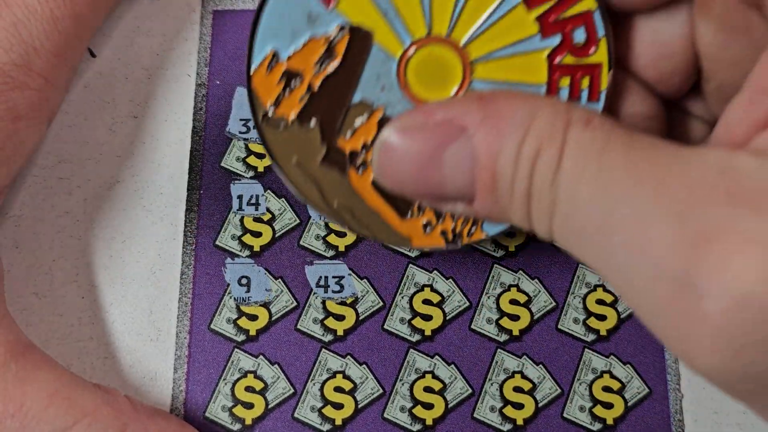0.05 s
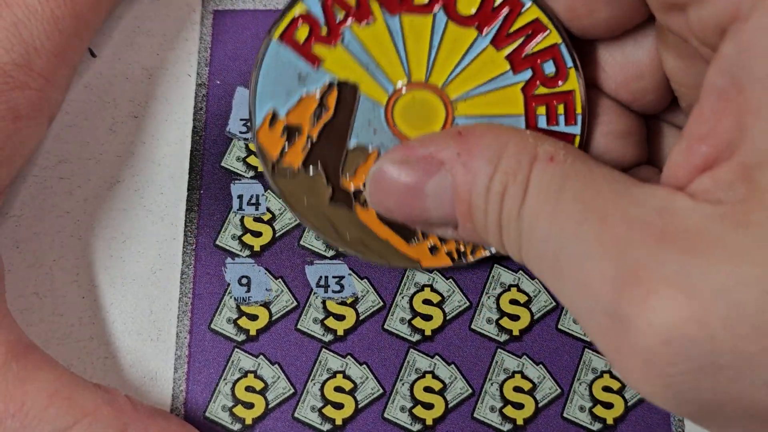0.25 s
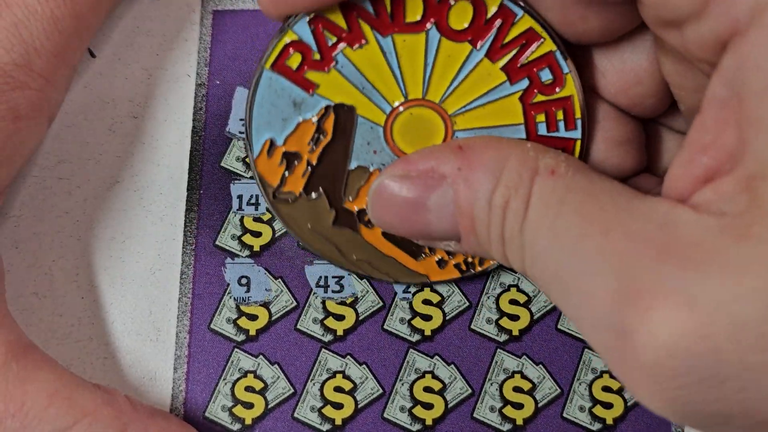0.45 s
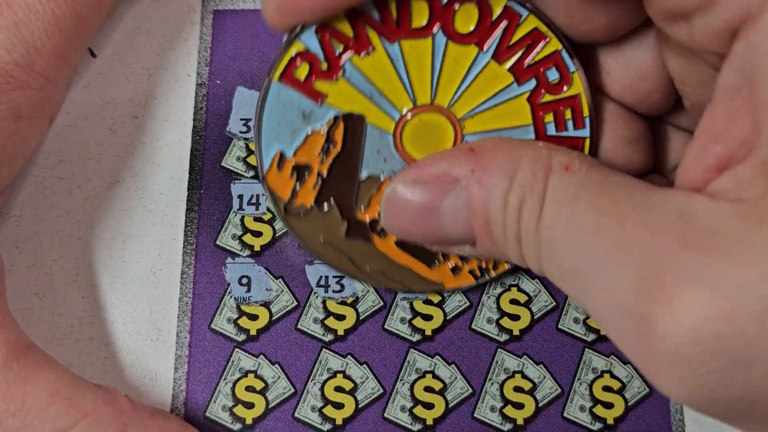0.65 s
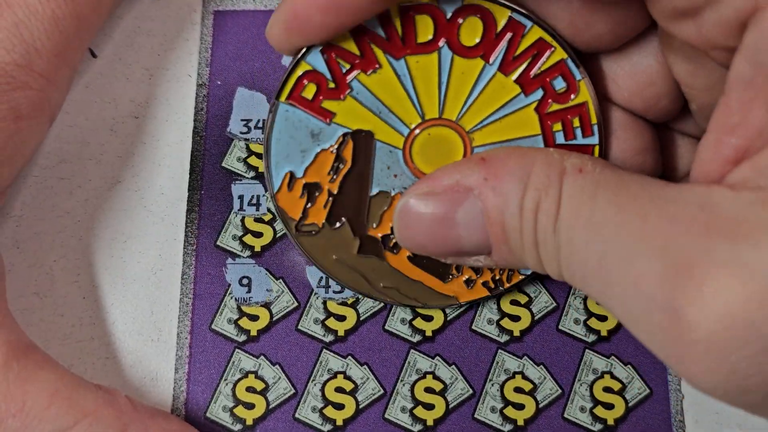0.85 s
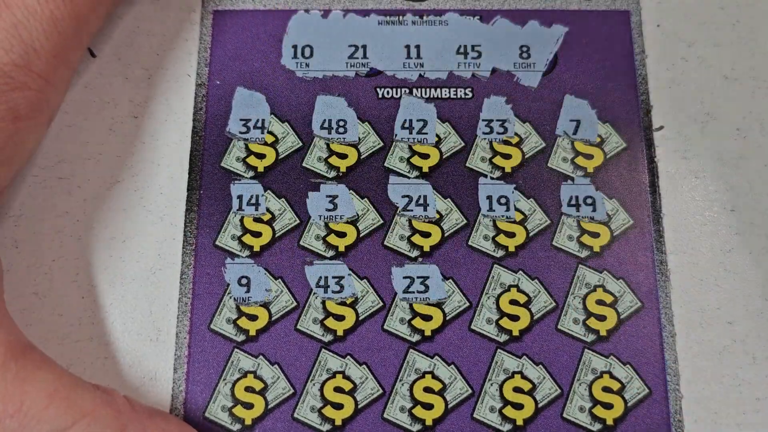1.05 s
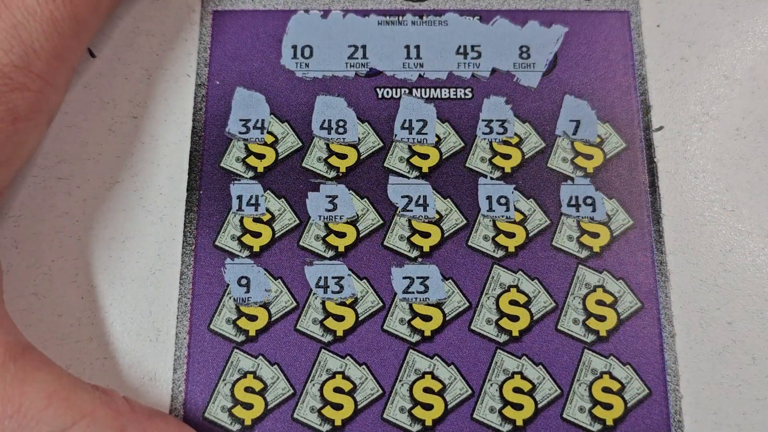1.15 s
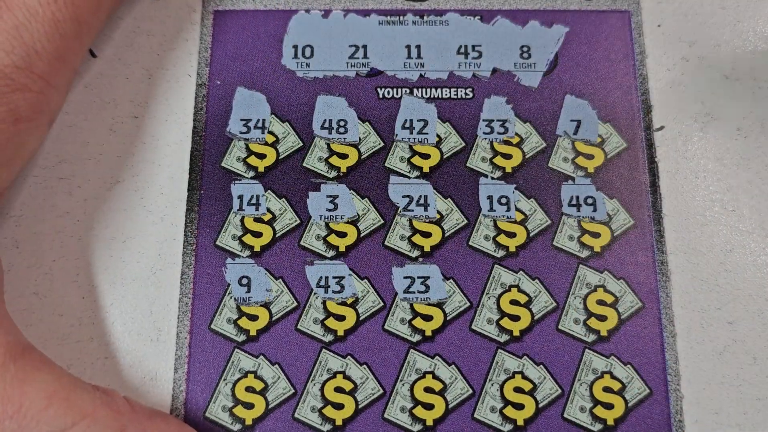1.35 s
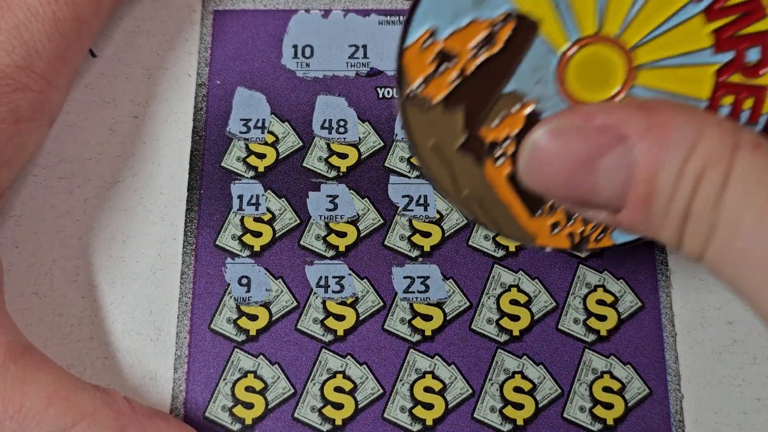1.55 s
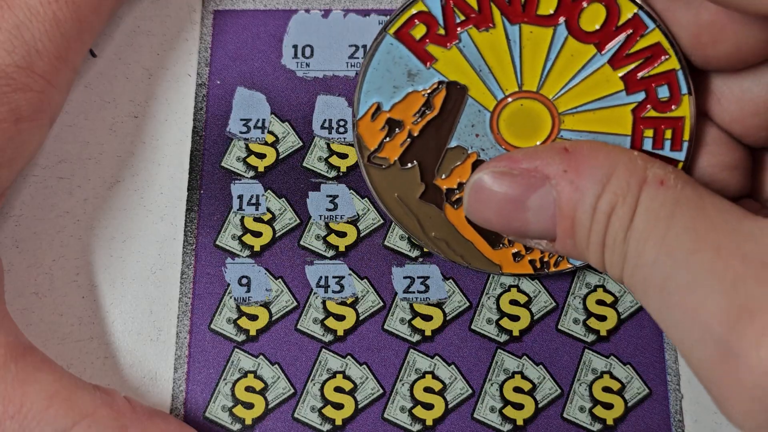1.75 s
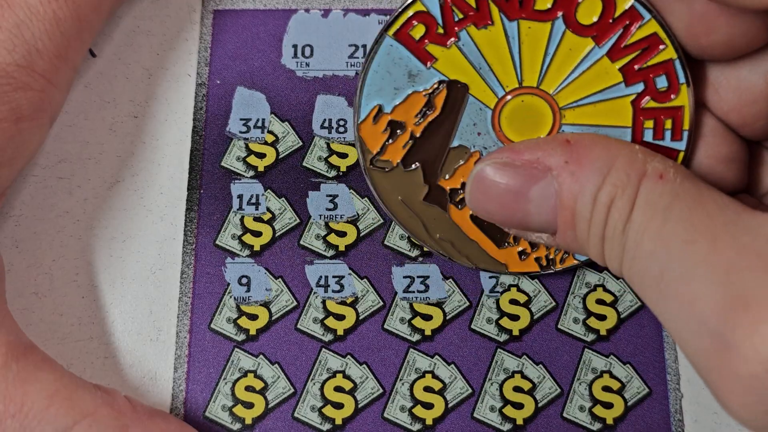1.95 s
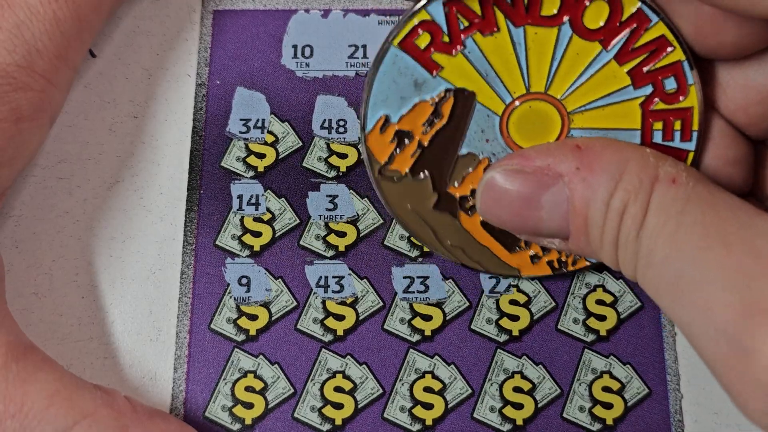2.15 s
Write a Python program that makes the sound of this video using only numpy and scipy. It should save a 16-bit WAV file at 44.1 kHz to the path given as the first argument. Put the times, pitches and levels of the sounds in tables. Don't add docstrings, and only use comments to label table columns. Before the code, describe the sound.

A heavy metal coin knocks down and scratches a paper ticket on a table in quick gritty strokes, pauses while the card rustles and air thumps softly, then knocks harder and scratches again; close stereo microphone, quiet humming room.

```python
import sys
import numpy as np
from scipy import signal
from scipy.fft import rfft, irfft
from scipy.io import wavfile

SR = 44100
rng = np.random.default_rng(int(sys.argv[2]) if len(sys.argv) > 2 else 0)


def gain_from_db(level_db):
    decades = np.asarray(level_db, float) / 20
    return 10 ** decades


def transcribe(signal):
    frames = np.atleast_2d(signal).T
    limited = np.clip(frames, -1, 1)
    pcm = np.round(limited * 32767).astype(np.int16)
    wavfile.write(sys.argv[1], SR, pcm)


N = 97020


def evened(x):
    return x / np.sqrt(np.mean(x ** 2) + 1e-20)


def read(points, hz):
    f, value = np.transpose(points)
    return np.interp(np.log(hz + 1), np.log(f + 1), value)


def along(points):
    s, db = np.transpose(points)
    return gain_from_db(np.interp(np.arange(N) / SR, s, db, left=-120, right=-120))


def tint(x, gain_db):
    return irfft(rfft(x) * gain_from_db(read(gain_db, np.fft.rfftfreq(N, 1 / SR))), N)


def drift(rate_hz):
    return evened(signal.lfilter(*signal.butter(2, rate_hz, fs=SR), rng.standard_normal(N)))


def add(mix, s, sound):
    part = mix[..., round(s * SR):][..., :sound.shape[-1]]
    part += sound[..., :part.shape[-1]]


def convolved(x, pair):
    return signal.oaconvolve(x[None], pair, axes=1)[:, :N]


def likened(a, b, like):
    return np.array([a, like * a + np.sqrt(1 - like ** 2) * b])


# f/Hz, likeness/1
LIKENESS = [(60, 1), (130, 0.95), (400, 0.98), (1000, 0), (9000, 0.14)]
# f/Hz, density/dB per Hz
ROOM_TONE = [(15, -39), (25, 4.5), (130, -24), (194, -15.5), (414, -17.5), (637, -41), (1280, -39.5),
             (8270, -67), (15800, -83)]
# f/Hz, width/Hz, level/dB
WHINES = [(2130, 120, -88), (3170, 86, -88), (1080, 690, -81.5)]


def room():
    floor_db, hum = -55, (119, 22, -54)
    hz = np.fft.rfftfreq(N, 1 / SR)
    a, b = rfft(rng.standard_normal((2, N)))
    z = likened(a, b, np.clip(read(LIKENESS, hz), 0, 1))
    out = gain_from_db(floor_db) * evened(irfft(z * gain_from_db(read(ROOM_TONE, hz)), N))
    for f, width_hz, db in WHINES + [hum]:
        resonance = 1 / (1 + ((hz - f) / (width_hz / 2)) ** 2)
        out += gain_from_db(db) * evened(irfft(z * resonance, N))
    return out


# t/s, level/dB
AIR = [(0, -62), (.5, -52), (.9, -48.5), (1.1, -40), (1.45, -43.5), (1.75, -49), (1.95, -49.5), (2.2, -49)]
# f/Hz, density/dB per Hz
AIR_TONE = [(20, -24.5), (45, 8), (90, 1.5), (200, -15), (400, -13.5), (700, -49), (1500, -73)]
# t/s, level/dB, f/Hz
PUFFS = [(0.714, -35.5, 100), (0.873, -37, 148), (0.899, -25, 110), (0.905, -32, 256), (1.068, -29.5, 109),
         (1.085, -28.5, 305), (1.123, -32, 105), (1.16, -31, 109), (1.195, -32, 333), (1.265, -39.5, 313),
         (1.288, -33, 226), (1.321, -32.5, 237), (1.336, -29, 106), (1.348, -31, 198), (1.407, -31.5, 58),
         (1.514, -26.5, 110), (1.578, -33, 102), (1.611, -31.5, 63.6), (1.64, -29.5, 73.4),
         (1.674, -31, 95), (1.911, -35, 59.7), (2.147, -41, 89.5)]


def buffeting():
    lump_db, right_db, puff_turns = 4.5, -9.5, 2.23
    lumpy = rng.standard_normal(N) * gain_from_db(lump_db * drift(38.0))
    left = evened(tint(lumpy, AIR_TONE)) * along(AIR)
    for s, db, hz in PUFFS:
        u = np.arange(0, puff_turns / hz, 1 / SR) * hz / puff_turns
        swell = np.sin(np.pi * u ** 0.46) ** 2
        add(left, s, gain_from_db(db) * swell * np.sin(2 * np.pi * (puff_turns * u + rng.random())))
    low = signal.lfilter(*signal.butter(2, 160.0, fs=SR), left)
    return np.array([left, gain_from_db(right_db) * low])


# t/s, level/dB
RUSTLE = [(0, -81), (.19, -68), (.3, -70.5), (0.88, -61), (0.908, -67), (1.09, -69.5), (1.184, -62.5),
          (1.33, -68), (1.492, -75), (1.528, -75), (1.698, -100), (1.72, -65.5), (2.2, -71.5)]
# f/Hz, density/dB per Hz
RUSTLE_TONE = [(290, -25.5), (500, -11), (760, -22), (1760, -32.5), (3090, -29.5), (7500, -42),
               (9700, -52.5), (11300, -45), (15800, -46.5)]


def rustle():
    level_db, patchy_db = 3, 1.2
    pair = [evened(tint(rng.standard_normal(N), RUSTLE_TONE)) for _ in range(2)]
    return np.array(pair) * along(RUSTLE) * gain_from_db(level_db + patchy_db * drift(36.0))


def nearby(x):
    early_db, early_t60_s, late_db, late_t60_s = -9, 0.02, -17, 0.46
    t = np.arange(SR // 3) / SR
    taps = rng.choice([-1., 1.], (2, len(t))) * (rng.random((2, len(t))) < 0.06)
    early, late = [taps * gain_from_db(-60 * t / t60) for t60 in (early_t60_s, late_t60_s)]
    early = gain_from_db(early_db) * early / np.linalg.norm(early[0])
    early[0, 0], early[1, 6] = 1, 1
    z = rfft(early[:, :1024])
    ir = gain_from_db(late_db) * late / np.linalg.norm(late[0])
    add(ir, 0, irfft(z / np.sqrt(abs(z) + 0.1)))
    return convolved(x, ir)


def ringing(drive, modes):
    wander_db = 3.5
    t, out = np.arange(2048) / SR, np.zeros((2, N))
    quarter = np.array([[np.pi / 2], [0]])
    for hz, width_hz, db in modes:
        ring = t * np.exp(-1.5 * np.pi * width_hz * t) * np.sin(2 * np.pi * hz * t + quarter)
        wander = wander_db * np.array([drift(24.0), drift(20.0)])
        out += gain_from_db(db + wander) * convolved(drive, ring / np.linalg.norm(ring[0]))
    return out


# f/Hz, width/Hz, level/dB
COIN = [(4520, 110, 0), (4350, 200, -3), (6500, 200, -7), (7500, 350, -17), (9800, 300, -17),
        (11390, 110, -7), (11050, 400, -10), (12200, 500, -15), (13400, 600, -18)]
# f/Hz, width/Hz, level/dB
COIN_LOW = [(2890, 80, 0), (2700, 90, -6), (3360, 110, -3), (3700, 150, -6)]
# t/s, level/dB, decay/s
TICKS = [
    (0.034, -59, 0.0036),
    (0.1705, -74, .003),
    (.7765, -63, 0.0022),
    (0.947, -56, .0015),
    (1.312, -58, 0.0019),
    (1.977, -68, 0.0018),
    (2.17, -59, 0.007),
]
# f/Hz, gain/dB
DRY_TONE = [(1500, -25), (2500, -6), (4300, 0), (7500, -5), (9000, -18), (12000, -14), (15500, -10)]


def ticks():
    ring_gain = 0.08
    air, t = np.zeros(N), np.arange(1500) / SR
    for s, db, decay_s in TICKS:
        add(air, s, gain_from_db(db) * np.exp(-t / decay_s) * rng.standard_normal(1500))
    return nearby(tint(air, DRY_TONE)) + ring_gain * ringing(air, COIN_LOW + COIN)


# f/Hz, level/dB, t60/s
TABLE = [(110, -5.5, 0.13), (238.8, -9.5, 0.33), (314.6, -3.5, 0.35), (350, -4, 0.2), (380.7, -8.5, 0.39),
         (469.2, -12.5, 0.17), (497, -6, 0.19), (595.7, -3.5, 0.088), (682, -18.5, 0.076), (834, -5, 0.1),
         (936, -6, 0.074), (1118, -22, 0.1), (1346, -2.5, 0.14), (1930, -21, 0.066)]
# f/Hz, density/dB per Hz
DENSE = [(80, 7), (200, -5.5), (350, 10), (700, 3.5), (1200, 3.5), (1600, -5), (2150, 9.5), (3500, -45)]
# f/Hz, t60/s
DENSE_T60 = [(200, 0.31), (700, 0.22), (1400, 0.21), (3000, 0.057)]


def table_ring():
    cluster, skew_hz, dense_db = 0.012, 520, -1
    hz, db, t60 = np.repeat(np.transpose(TABLE), 3, axis=1)[:, :, None]
    t = np.arange(SR // 2) / SR
    detune, skew = rng.uniform(-1.045, 1, (2, len(hz), 1))
    turn = 2 * np.pi * hz * (1 + cluster * detune) * t
    decay = gain_from_db(db - 60 * t / t60)
    phase = skew * hz / skew_hz
    modes = np.array([(decay * np.cos(turn + side * phase)).sum(0) for side in (1, -1)])
    f, s, z = signal.stft(rng.standard_normal((2, len(t))), SR, nperseg=256)
    z = likened(z[0], z[1], np.clip(read(LIKENESS, f), 0, 1)[:, None])
    fade_db = read(DENSE, f)[:, None] - 60 * s / read(DENSE_T60, f)[:, None]
    crowd = signal.istft(z * gain_from_db(fade_db), SR, nperseg=256)[1][:, :len(t)]
    crowd = crowd * np.minimum(t / 0.0035, 1)
    return modes / np.linalg.norm(modes[0]) + gain_from_db(dense_db) * crowd / np.linalg.norm(crowd[0])


def slipping():
    slips_per_s, spread_db, chatter_db = 9000, 2.4, 1.2
    sizes = gain_from_db(spread_db * np.minimum(rng.exponential(1, N), 4)) * rng.choice([-1., 1.], N)
    slips = sizes * (rng.random(N) < slips_per_s / SR)
    return evened(slips + 0.39 * rng.standard_normal(N)) * gain_from_db(chatter_db * drift(87.0))


def stroke(length_s, db, rise=0.15, fall=0.66):
    u = np.arange(0, length_s, 1 / SR) / length_s
    return gain_from_db(db) * np.clip(np.minimum(u / rise, (1 - u) / fall), 0, 1) ** 1.44


# t/s, level/dB, length/s
BRUSHES = [
    (0.16, -73.5, 0.066),
    (0.192, -65, 0.027),
    (0.95, -68, 0.034),
    (1.159, -73, 0.016),
    (1.304, -70, 0.012),
    (1.726, -49.5, 0.025),
]
# t/s, length/s, level/dB, table share/dB, low ring share/dB
FORTH = [
    (0.29, 0.059, -51.5, 3, -7),
    (0.478, 0.064, -62.5, 13, -2.5),
    (0.658, 0.065, -59, 5.5, -4.5),
    (0.832, 0.053, -57.5, 9.5, -0.5),
    (1.826, 0.056, -52.5, 0.5, -6.5),
    (2.003, 0.069, -63.5, 8.5, -3),
    (2.183, 0.053, -54.5, 3, -3),
]
# t/s, length/s, level/dB, table share/dB, low ring share/dB
BACK = [
    (0.394, 0.063, -57, 4, 0),
    (0.607, 0.029, -61, 10, 4),
    (0.779, 0.041, -56, 0.5, 1),
    (1.924, 0.048, -49, -4.5, -3),
    (2.135, 0.021, -59, 10, -0.5),
]
# f/Hz, density/dB per Hz
GRIT = [(500, -10), (1100, -2), (2050, 0), (2500, -9), (4300, -10), (5500, -28), (8600, -31), (15500, -32)]
# f/Hz, density/dB per Hz
GRIT_BACK = [(500, -8), (1100, -4), (2200, -14), (3000, -3), (4300, -7), (5500, -26), (8600, -28),
             (15500, -29)]
# f/Hz, width/Hz, level/dB
CARD = [(509.4, 27, 2), (604, 105, -0.5), (679, 130, -3.5), (880, 13, -4), (963, 45, -1), (1104, 50, -10),
        (1380, 17, -6.5)]


def scraping(table):
    grit_db, grit_back_db, second_train_db = -0.5, 2.5, -23
    coin_db, low_db, card_db, table_db = -4, -3.5, -7.5, -2
    lead_s, coast_s, coast_db, hiss_coast_db = 0.022, 0.038, -21, -35
    forth, back, push, low, light = np.zeros((5, N))
    for rows, way, rise, fall in ((FORTH, forth, 0.37, 0.33), (BACK, back, 0.18, 0.74)):
        for s, length_s, db, share_db, low_share_db in rows:
            for mix, more_db in ((way, 0), (push, share_db), (low, low_share_db)):
                add(mix, s, stroke(length_s, db + more_db, rise, fall))
    for s, db, length_s in BRUSHES:
        add(light, s, stroke(length_s, db))

    t = np.arange(-SR // 4, SR // 4 + 1) / SR
    coast = np.exp(-np.maximum(t / coast_s, -t / lead_s)) / (coast_s * SR) * gain_from_db(13)
    uneven = gain_from_db(1.2 * drift(57.0))

    def dragged(pressure, db):
        return uneven * (pressure + gain_from_db(db) * signal.oaconvolve(pressure, coast, "same"))

    rough_forth, rough_back = dragged(forth, hiss_coast_db), dragged(back, hiss_coast_db)
    forth, back = dragged(forth, coast_db - 17), dragged(back, coast_db - 15)
    push, low = dragged(push, coast_db), dragged(low, coast_db)

    slips = slipping()
    out = np.zeros((2, N))
    for train, db in ((slips, 0), (slipping(), second_train_db)):
        hiss = (gain_from_db(grit_db) * rough_forth + light) * evened(tint(train, GRIT))
        hiss += gain_from_db(grit_back_db) * rough_back * evened(tint(train, GRIT_BACK))
        out += nearby(gain_from_db(db) * hiss)
    out += gain_from_db(coin_db) * ringing((forth + back + 0.28 * light) * slips, COIN)
    out += gain_from_db(card_db) * ringing(push * slips, CARD)
    out += gain_from_db(low_db) * ringing((low + 0.42 * light) * slips, COIN_LOW)
    return out + gain_from_db(table_db) * convolved(push * slips, table)


# t/s, level/dB, rim tick/dB
KNOCKS = [
    (0.2027, -25, -9),
    (1.728, -18.5, -8),
]
# f/Hz, gain/dB
TICK_TONE = [(1000, 19.5), (5000, -5), (12000, -10), (15500, -5), (16500, -45)]


def knocks(table):
    blow_s, rebound, thud_db = 0.00081, 0.9, -6
    tick_lead_s, tick_decay_s, coin_gain = 0.00086, 0.00092, 0.22
    air, wood = np.zeros(N), np.zeros((2, N))
    blow = -np.sin(np.pi * np.arange(0, blow_s, 1 / SR) / blow_s) ** 2
    ring = convolved(blow, table)
    ring = ring / abs(ring).max()
    dent = np.r_[blow, -rebound * np.repeat(blow, 2)]
    add(ring, 0, gain_from_db(thud_db) * np.tile(dent, (2, 1)))
    t = np.arange(600) / SR
    snap = np.minimum(t / 0.0003, 1) * np.exp(-t / tick_decay_s)
    for s, db, tick_db in KNOCKS:
        add(wood, s, gain_from_db(db) * ring)
        add(air, s - tick_lead_s, gain_from_db(db + tick_db) * snap * rng.standard_normal(600))
    return wood + nearby(tint(air, TICK_TONE)) + coin_gain * ringing(air, COIN + COIN_LOW)


# f/Hz, left over right/dB
PORTS = [(60, -13.5), (180, 3.5), (550, 6), (1300, -2), (2400, 3.5), (4970, 13), (8000, -18), (15000, 4.5)]


def scene():
    table = table_ring()
    coin = ticks() + scraping(table) + knocks(table)
    f, db = np.transpose(PORTS)
    coin = np.array([tint(c, np.transpose([f, side * db / 2])) for c, side in zip(coin, (1, -1))])
    return room() + buffeting() + rustle() + coin


def low_pass(x):
    return signal.sosfilt(signal.butter(12, 16420, fs=SR, output="sos"), x)


def record(dry):
    bass_hz, port_hz, port_width_hz, port_db, edge_hz = 33, 11400, 350, 6, 15750
    hz = np.fft.rfftfreq(N, 1 / SR)
    colour = gain_from_db(port_db / (1 + ((hz - port_hz) / port_width_hz) ** 2))
    colour = colour * hz ** 2 / (hz ** 2 + bass_hz ** 2)
    colour = colour / (1 + (hz / edge_hz) ** 160)
    return low_pass(irfft(rfft(dry) * colour, N))


dry = scene()
out = record(dry)
transcribe(out)
```